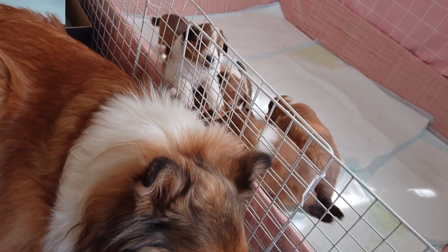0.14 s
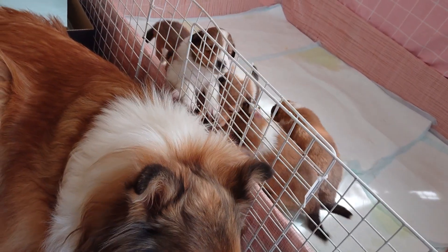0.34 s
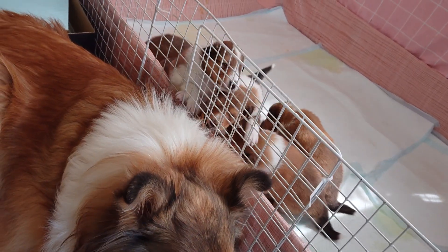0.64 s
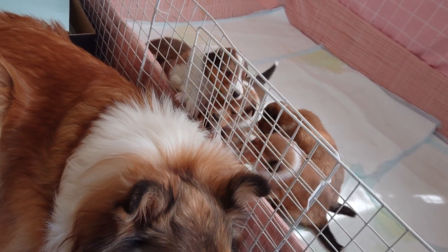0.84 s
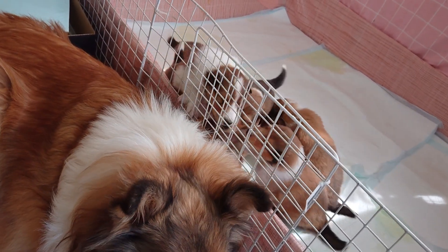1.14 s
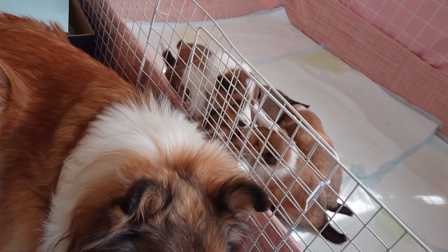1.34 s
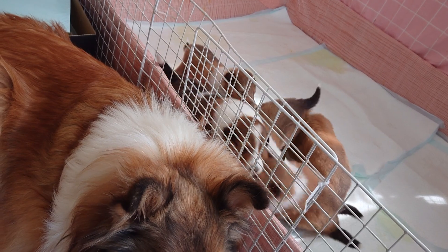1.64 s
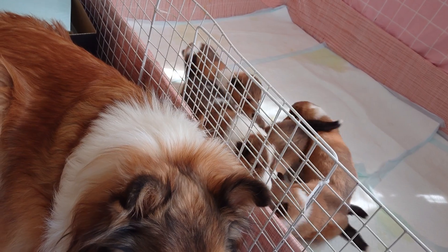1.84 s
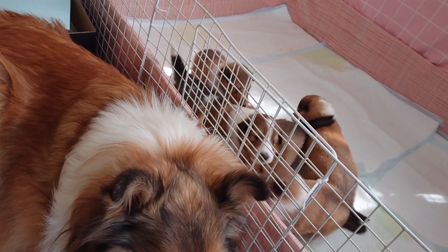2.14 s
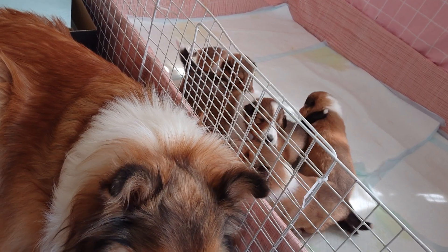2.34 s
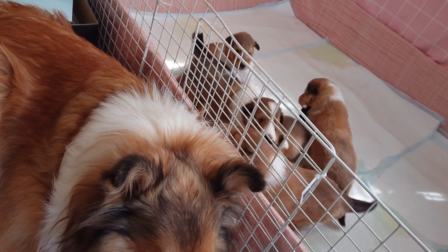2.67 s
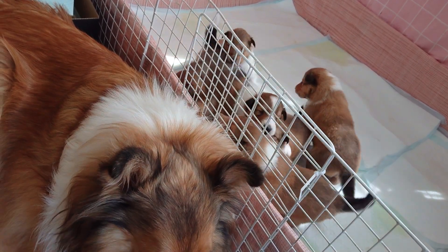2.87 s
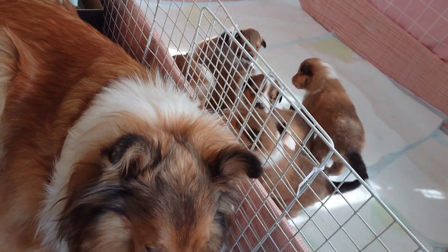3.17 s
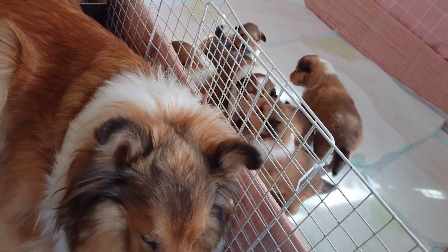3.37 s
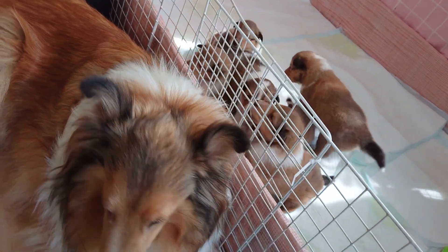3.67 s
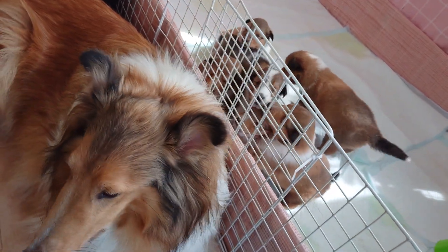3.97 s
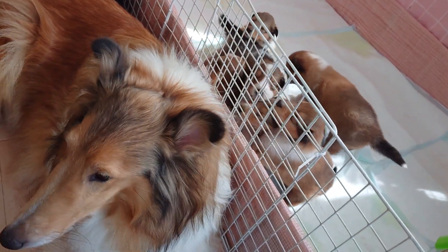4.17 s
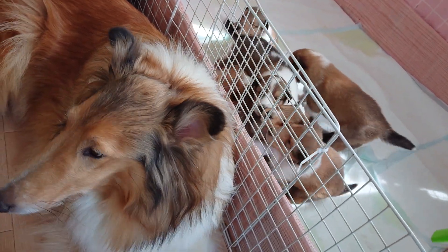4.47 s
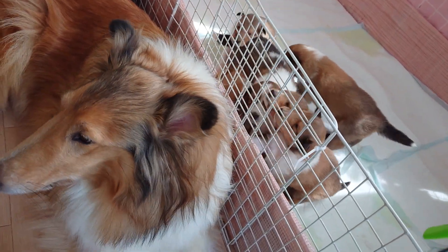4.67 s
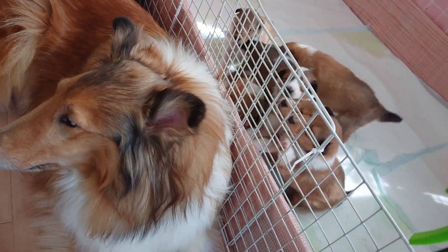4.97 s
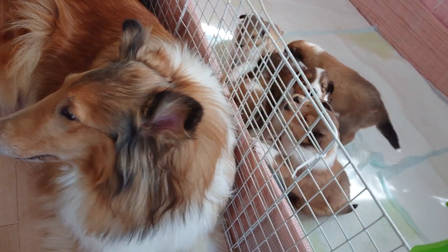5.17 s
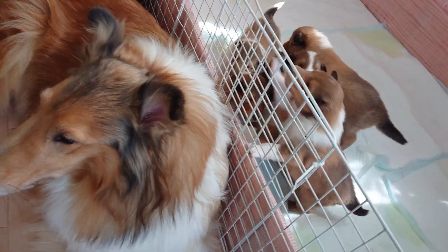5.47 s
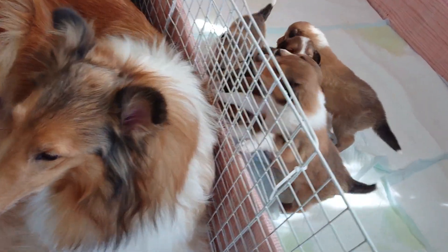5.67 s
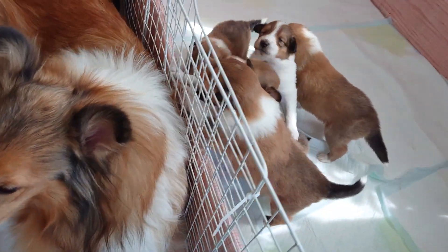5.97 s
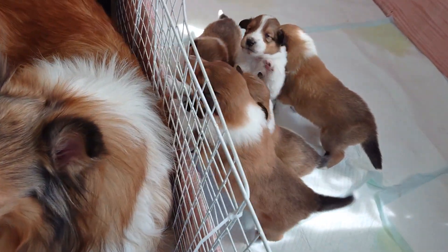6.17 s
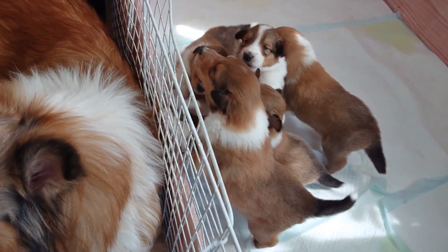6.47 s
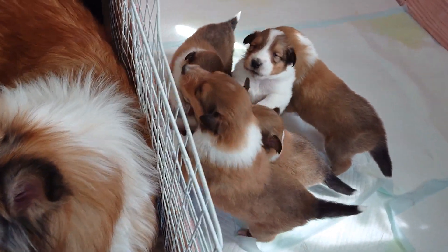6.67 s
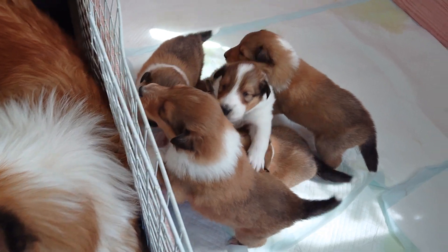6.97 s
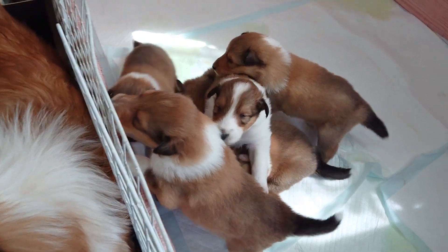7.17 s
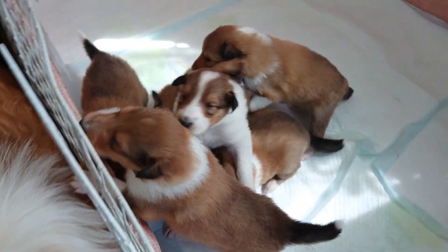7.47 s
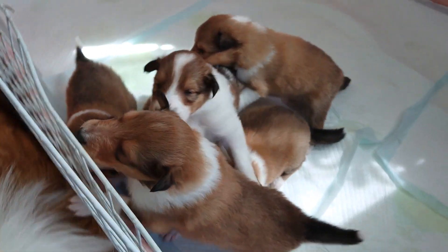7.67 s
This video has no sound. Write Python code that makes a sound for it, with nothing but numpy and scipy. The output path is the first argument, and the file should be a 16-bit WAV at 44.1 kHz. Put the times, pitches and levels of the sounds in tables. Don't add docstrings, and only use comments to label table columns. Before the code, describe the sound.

Faint room hum and hiss sit under brief puppy voices: thin squeaks at first, then low whimpers that rise and fall. Claws snap sharply on a mat near two seconds, bodies bump softly, and loose wires rattle past the middle. The last two seconds are liveliest, with loud squeaks, whines and scrabbling, picked up close in a small, slightly echoing room.

```python
import sys
import numpy as np
from scipy import signal
from scipy.fft import rfft, irfft, next_fast_len
from scipy.io import wavfile
from scipy.ndimage import uniform_filter1d

SR = 44100
rng = np.random.default_rng(int(sys.argv[2]) if len(sys.argv) > 2 else 0)


def amplitude_ratio(level_db):
    exponent = np.asarray(level_db, float) / 20
    return 10 ** exponent


def to_wav(sig):
    pcm = np.clip(np.atleast_2d(sig), -1, 1) * 32767
    pcm = np.round(pcm).astype(np.int16)
    wavfile.write(sys.argv[1], SR, pcm.T)


N = 344862
TIME_S = np.arange(N) / SR
GRID_HZ = np.fft.rfftfreq(next_fast_len(N + SR), 1 / SR) + 1e-3

# [f/Hz, density/dB per Hz]
MAT = [(120, -28), (200, -5), (538, -6.5), (1480, -8.5), (2290, -2.5), (3310, -11.5), (8120, -14),
       (9060, -22), (10300, -12), (14300, -15.5), (16000, -19.5)]


def on_hz(points, f_hz=GRID_HZ):
    table_hz, value = np.transpose(points)
    return np.interp(np.log(f_hz), np.log(table_hz), value)


def colour(x, gain_db):
    size = 2 * (len(GRID_HZ) - 1)
    cepstrum = irfft(np.log(amplitude_ratio(gain_db)), size)
    cepstrum[1:size // 2] *= 2
    cepstrum[size // 2 + 1:] = 0
    response = np.exp(rfft(cepstrum))
    return irfft(rfft(x, size) * response, size)[..., :N]


def unit(x):
    return x / np.sqrt(np.mean(x ** 2))


def walk(rate_hz):
    span = max(int(SR / rate_hz), 2)
    once = uniform_filter1d(rng.standard_normal(N), span)
    return unit(uniform_filter1d(once, span))


def pan(x, left_minus_right_db):
    return x * amplitude_ratio(np.array([[.5], [-.5]]) * left_minus_right_db)


def ring(x, modes):
    t = TIME_S[:SR // 2]
    body = 0
    for mode_hz, mode_db, t60_s in modes:
        decay = amplitude_ratio(-60 * t / max(t60_s, .005))
        body = body + amplitude_ratio(mode_db) * np.sin(2 * np.pi * mode_hz * t) * decay
    return signal.fftconvolve(x, body[None])[:, :N]


def pair():
    # [f/Hz, correlation]
    likeness = [(100, 0.9), (500, 0.72), (1500, 0.24), (4000, 0.041), (16000, 0.046)]
    mid, side = rng.standard_normal((2, N))
    like = np.clip(on_hz(likeness), 0, .999)
    mid = colour(mid, 10 * np.log10(1 + like))
    side = colour(side, 10 * np.log10(1 - like))
    return np.array([mid + side, mid - side]) / 2


def hush():
    # [f/Hz, density/dB per Hz]
    hush_spectrum = [(18, -42.5), (30, 10), (138, -1), (179, -23.5), (311, -6), (374, -15.5), (512, -11.5),
                     (740, -4.5), (866, -6.5), (2350, -11.5), (3220, -22.5), (6050, -24.5), (8980, -40.5),
                     (10200, -19), (16000, -22.5)]
    level_db = -59.5 + 0.56 * walk(6.3)
    return amplitude_ratio(level_db) * unit(colour(pair(), on_hz(hush_spectrum)))


def room(x):
    # [f/Hz, t60/s]
    room_decay = [(200, 0.21), (1500, 0.2), (12000, 0.13)]
    t = TIME_S[:SR // 2]
    noise = pair()[:, :SR // 2]
    tail = 0
    for (band_hz, t60_s), kind in zip(room_decay, ("low", "band", "high")):
        edge_hz = {"low": band_hz * 2.5, "band": [band_hz / 3, band_hz * 3], "high": band_hz / 2.7}[kind]
        sos = signal.butter(2, edge_hz, kind, fs=SR, output="sos")
        tail = tail + signal.sosfilt(sos, noise) * amplitude_ratio(-60 * t / t60_s)
    tail = tail * np.clip((t - .002) / 0.0049, 0, 1)
    tail = tail / np.sqrt(np.sum(tail ** 2) / 2)
    echo_db = -8
    return amplitude_ratio(echo_db) * signal.fftconvolve(x.mean(0, keepdims=True), tail, axes=1)[:, :N]


def bumps(level_db):
    # [f/Hz, density/dB per Hz]
    thud_spectrum = [(29, -32.5), (50, 7), (140, -4.5), (328, -11), (426, -14), (600, -25), (780, -53.5),
                     (1320, -120)]
    return amplitude_ratio(level_db - 3 + 2.44 * walk(25)) * unit(colour(pair(), on_hz(thud_spectrum)))


def scrabble(level_db):
    slips_per_s = 900
    size = amplitude_ratio(6.06 * rng.exponential(size=N))
    slips = (rng.random(N) < slips_per_s / SR) * size * rng.choice([-1, 1], N)
    rub = 1.24 * pair() * amplitude_ratio(3.8 * walk(40))
    grit = pan(unit(slips), -1.8) + rub
    return amplitude_ratio(level_db + 9.5) * unit(colour(grit, on_hz(MAT)))


def wire():
    # [f/Hz, level/dB, t60/s]
    wire_modes = [(9500, -46, 5.0), (9800, -16, 1.7), (10870, -9, 0.31), (11220, -21, 4.3),
                  (11200, -11, 0.3), (11720, -25, 1.7), (12630, -4, 0.12), (13600, -4, 0.073),
                  (14350, -23, 0.14), (14780, -22, 0.86)]
    # [t/s, level/dB]
    rattle = [(5.465, -80), (5.475, -46), (5.49, -33), (5.54, -39), (5.6, -49), (5.7, -66), (5.715, -50),
              (5.75, -52), (5.757, -37), (5.8, -54), (5.859, -49), (5.93, -70)]
    t_s, level_db = np.transpose(rattle)
    taps_per_s = 150
    size = amplitude_ratio(3.2 * rng.exponential(size=(2, N)))
    taps = (rng.random((2, N)) < taps_per_s / SR) * size
    return amplitude_ratio(np.interp(TIME_S, t_s, level_db, -200, -200)) * unit(ring(taps, wire_modes))


def claws():
    # [t/s, peak/dB, knock re peak/dB, left minus right/dB]
    ticks = [(0.0773, -41, -33, 1), (0.1944, -43, -8, -8), (0.3108, -49, -7, -2.5), (0.6247, -52, -8, -3.0),
             (0.9345, -57, -16, -1.5), (1.1608, -53, -21, -2.0), (1.196, -57, -19, -2.0),
             (1.218, -43, -21, -3), (1.3775, -41, -15, 1), (1.498, -42.5, -19, -8), (1.757, -46, -13, -3.5),
             (1.7574, -41, -21, -1.5), (1.7916, -31, -19, -3.0), (1.8416, -32, -13, -2.0),
             (1.8897, -32, -8, -3.0), (2.0608, -30, -13, 2.5), (2.0603, -13.5, -30, -1.0),
             (2.1372, -18, -28, -5), (2.4145, -34, -8.5, -2.0), (2.6367, -57, -18, -8),
             (2.807, -34.5, -15.5, -8), (2.8484, -26, -9, -0.5), (3.6321, -54, -20, -7),
             (3.8298, -37, -18, -8), (4.0836, -33, -15, -5), (4.1029, -38.5, -8, -6),
             (4.3336, -36, -27, -7), (4.4005, -35, -12.5, -4), (4.4216, -26, -18, -5),
             (4.5639, -33, -10, -5), (5.2317, -39, -14, -3.5), (5.3637, -43, -12, -1.0),
             (5.391, -36, -14, -0.5), (5.4135, -33, -14.5, -6), (5.473, -39, -19, -1.5),
             (5.4835, -26, -23, -12), (5.7526, -37, -19, -6), (5.8167, -35, -13, -19),
             (5.8685, -26, -16, -9), (5.9818, -24.5, -20, 6), (6.0762, -34, -15, -0.5),
             (6.101, -30.5, -22, -3), (6.3053, -44, -6.5, 0.5), (6.327, -37.5, -16, -0.5),
             (6.3797, -26.5, -26, -0.5), (6.4342, -29.5, -13, -1.0), (6.4911, -45, -19, -2.0),
             (6.5104, -48, -9, 1.5), (6.5306, -24, -21, -0.5), (6.5927, -25.5, -12, -2),
             (6.6889, -24.5, -22.5, 4), (6.77, -44, -12, 3), (6.787, -37, -12, -5), (6.921, -41, -6, 1.0),
             (6.9496, -42, -4, 1.0), (7.1195, -36, -23, 0.0), (7.1311, -18, -22, 4),
             (7.1549, -17, -20.5, 9), (7.195, -32, -20, -1.5), (7.2657, -20.5, -22.5, 5),
             (7.302, -22, -16, 4), (7.3957, -36, -7, -2.0), (7.4725, -26.5, -18, 6),
             (7.5872, -49, -17, 1.0)]
    # [f/Hz, level/dB, t60/s]
    floor_modes = [(334.6, 5.5, 0.052), (191, -6.5, 0.057), (651, -2, 0.046)]
    t_s, peak_db, knock_db, pan_db = np.transpose(ticks)
    at = (t_s * SR).astype(int)
    click, knock = np.zeros((2, N)), np.zeros((2, N))
    click[:, at] = pan(amplitude_ratio(peak_db), pan_db)
    knock[:, at] = amplitude_ratio(peak_db + knock_db)
    return amplitude_ratio(19) * colour(click, on_hz(MAT)) + amplitude_ratio(-2.5) * ring(knock, floor_modes)


def voice(calls, voices):
    # [f/Hz, gain/dB]
    throat = [(1000, -15), (1500, -8), (2300, -32.5), (3000, -43), (3700, -32), (4300, -40.5),
              (5200, -22.5), (6000, -26), (7500, -68), (12000, -59.5)]
    out = np.zeros((2, N))
    jitter, shimmer = walk(330), walk(160)
    for rows, (overtone_db, pan_db, hoarse) in zip(calls, voices):
        t_s, pitch_hz, level_db = np.transpose(rows)
        now = slice(int(t_s[0] * SR), int((t_s[-1] + 0.0058) * SR))
        t = TIME_S[now]
        pitch = np.interp(t, t_s, pitch_hz) * (1 + 0.12 * hoarse * jitter[now])
        phase = 2 * np.pi * np.cumsum(pitch) / SR
        tone = np.sin(phase)
        for k in range(2, 9):
            tone = tone + amplitude_ratio(overtone_db + on_hz(throat, k * pitch)) * np.sin(k * phase)
        edge = np.clip(np.minimum(t - t[0], t[-1] - t) / 0.0052, 0, 1)
        loudness = amplitude_ratio(np.interp(t, t_s, level_db) + 11.3 * hoarse * shimmer[now])
        out[:, now] += pan(np.sqrt(2) * edge * tone * loudness, pan_db)
    return out


def whines():
    # [t/s, pitch/Hz, level/dB]
    whine_calls = [
        [(0.93, 652, -78), (0.942, 680, -40), (0.975, 665.0, -66)],
        [(2.87, 636, -40), (2.888, 647.7, -41), (2.905, 634, -54)],
        [(3.575, 697, -59), (3.603, 680, -44), (3.655, 681, -60)],
        [(3.998, 635, -66), (4.01, 635.0, -40.5), (4.03, 630, -70)],
        [(4.213, 728, -39.5), (4.259, 910, -41), (4.285, 794, -42.5)],
        [(4.455, 662, -42.5), (4.509, 790, -37), (4.535, 727, -44)],
        [(4.695, 747, -49), (4.787, 1018, -44), (4.833, 991, -41.5), (4.86, 753, -46.5)],
        [(5.025, 794, -46), (5.123, 1196, -52), (5.163, 1129, -53), (5.19, 763, -42)],
        [(5.345, 828.8, -48), (5.419, 1120, -51), (5.475, 1056, -51.5), (5.505, 696, -44.5)],
        [(5.65, 745, -49), (5.684, 855, -35.5), (5.715, 629, -39.5)],
        [(5.745, 640, -42), (5.791, 848, -52.5), (5.81, 800, -62)],
        [(6.055, 663, -62), (6.075, 651, -36), (6.095, 648.3, -62)],
        [(6.305, 525, -71), (6.321, 528, -42.5), (6.33, 493, -63)],
        [(6.538, 765, -52), (6.56, 718, -32), (6.605, 690, -43.5)],
        [(6.788, 669, -39), (6.86, 972, -48.5), (6.894, 788, -37), (6.91, 596, -45)],
        [(7.075, 803, -48.5), (7.155, 1163, -40.5), (7.213, 860, -41.5), (7.235, 594, -37.5)],
        [(7.395, 540, -49), (7.439, 677, -32.5), (7.47, 670, -44)],
        [(7.675, 712.8, -59), (7.703, 652, -37.5), (7.733, 863, -50), (7.77, 615, -45)],
    ]
    # [overtones/dB, left minus right/dB, hoarseness/0-1]
    whine_voices = [(-3, 0, 0.084), (-6, 0, 0.16), (3, 0, 0.18), (-1, 0, .1), (-0.5, 0, .1),
                    (-8.5, 0, 0.073), (3, 0, 0.038), (1, 0, .05), (4.5, 0, 0.042), (-5.5, 0, 0.36),
                    (5, 0, 0.36), (1, 0, 0.13), (-2, 0, 0.09), (-6, 0, 0.081), (-2, 0, 0.14),
                    (-3, 0, 0.094), (-2, 0, 0.41), (-3.5, 0, 0.54)]
    return voice(whine_calls, whine_voices)


def squeals():
    # [t/s, pitch/Hz, level/dB]
    squeal_calls = [
        [(0.045, 1695, -55.5), (0.099, 1825, -35), (0.153, 1982, -41), (0.175, 1203, -59)],
        [(0.333, 1660, -59), (0.347, 1662, -39), (0.419, 1708, -36), (0.455, 1155, -54)],
        [(0.615, 1554, -44.5), (0.689, 1917, -48), (0.729, 1705, -47), (0.755, 1085, -55)],
        [(6.0, 837, -67), (6.036, 1176, -46.5), (6.072, 1489, -40), (6.12, 1230, -58)],
        [(6.293, 1640, -49), (6.325, 1873, -62), (6.375, 2190, -66), (6.42, 1956, -57)],
        [(6.61, 1732, -44), (6.718, 2024, -29), (6.75, 1917, -30.5), (6.765, 1220, -50)],
        [(6.93, 1705, -42), (6.952, 1776, -28), (7.08, 1798, -37), (7.11, 1107, -41)],
        [(7.275, 1006, -45), (7.345, 1310, -31), (7.421, 1180, -42), (7.435, 1150, -48)],
        [(7.635, 985, -53), (7.651, 1049, -44.5), (7.699, 1265, -34.5), (7.79, 1078, -45.5)],
    ]
    # [overtones/dB, left minus right/dB, hoarseness/0-1]
    squeal_voices = [(2.5, 5, 0.16), (2.5, 5.5, 0.11), (-3, 2, 0.04), (6, 2, 0.07), (-6, 8, 0.08),
                     (-4.5, 2.5, 0.12), (-0.5, 6, 0.16), (5.5, 0, 0.07), (6.5, 3, 0.13)]
    return voice(squeal_calls, squeal_voices)


def scene():
    # [t/s, scrabble/dB, bump/dB]
    moves = [(0.0, -97, -66), (0.08, -64.5, -57), (0.33, -77.5, -66.5), (0.94, -77.5, -61),
             (0.98, -58.5, -69), (1.13, -84.5, -71.5), (1.7, -77, -54), (1.85, -47, -49.5),
             (1.94, -51, -43), (2.02, -63.5, -48), (2.07, -42.5, -42), (2.11, -58.5, -55),
             (2.16, -49.5, -54), (2.22, -74, -77), (2.4, -99, -70), (2.41, -48.5, -53), (2.5, -85, -69),
             (2.77, -80, -66), (2.87, -44.5, -49), (2.96, -51.5, -43), (3.02, -76.5, -59),
             (4.05, -75, -65.5), (4.12, -51.5, -59), (4.18, -73, -78), (4.33, -72, -69), (4.44, -49, -57),
             (4.55, -69, -56), (4.57, -48, -45), (4.66, -73.5, -62), (5.16, -66.5, -64), (5.23, -66, -52),
             (5.31, -67.5, -68), (5.46, -49, -46), (5.49, -44, -32), (5.53, -52, -34), (5.68, -56.5, -46.5),
             (5.77, -52, -52.5), (5.84, -53.5, -37.5), (5.97, -62.5, -51), (6.27, -69.5, -62),
             (6.34, -56, -51), (6.4, -59, -71), (6.45, -53.5, -52), (6.49, -67, -66), (6.53, -49.5, -32),
             (6.62, -59, -53), (6.88, -68, -57), (6.93, -59.5, -61), (7.06, -69.5, -61), (7.17, -38, -52),
             (7.23, -65, -61), (7.32, -42, -40.5), (7.49, -60.5, -44.5), (7.56, -67, -71),
             (7.6, -67.5, -50.5), (7.82, -66, -66)]
    t_s, scrabble_db, bump_db = np.transpose(moves)
    near = squeals() + whines() + claws() + wire()
    near = near + scrabble(np.interp(TIME_S, t_s, scrabble_db))
    return near + room(near) + bumps(np.interp(TIME_S, t_s, bump_db)) + hush()


def top_cut(x):
    return signal.sosfilt(signal.butter(12, 16830, fs=SR, output="sos"), x)


def record(dry):
    # [f/Hz, width/Hz, depth/dB]
    ports = [(7350, 990, -38), (9150, 2400, -2.5)]
    heard = []
    for channel, (notch_hz, width_hz, depth_db) in zip(dry, ports):
        notch_db = depth_db / (1 + (2 * (GRID_HZ - notch_hz) / width_hz) ** 2)
        heard.append(colour(channel, notch_db))
    low_pass = signal.ellip(8, .2, 40, 15800, fs=SR, output="sos")
    return top_cut(signal.sosfilt(low_pass, heard))


dry = scene()
out = record(dry)
to_wav(out)
```